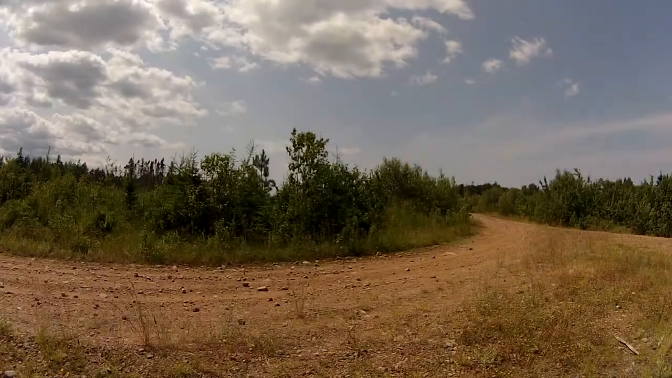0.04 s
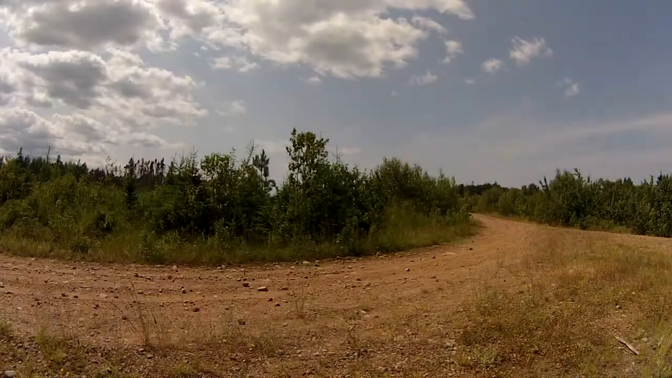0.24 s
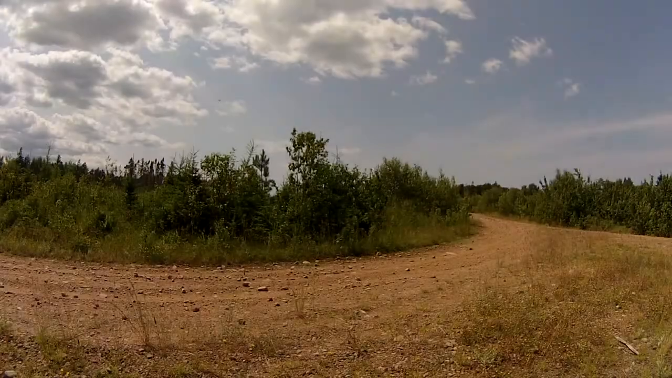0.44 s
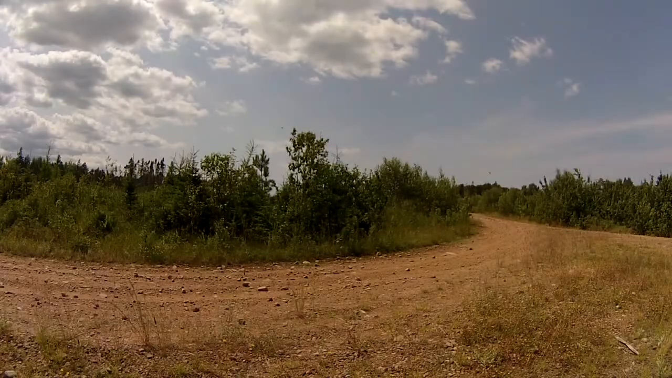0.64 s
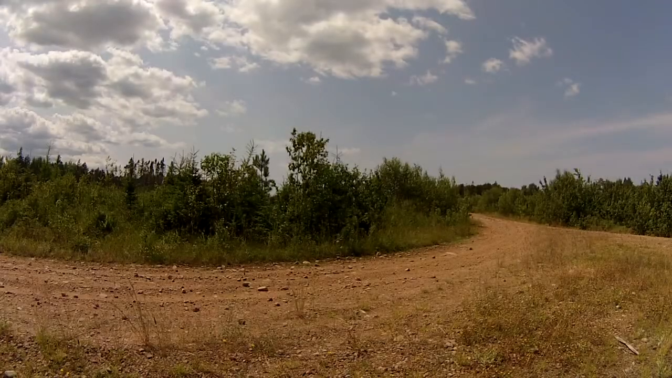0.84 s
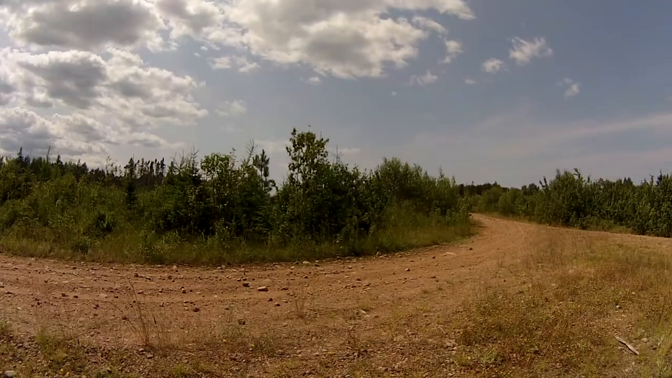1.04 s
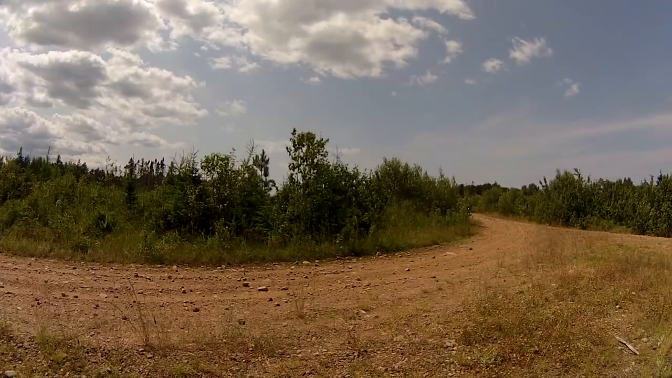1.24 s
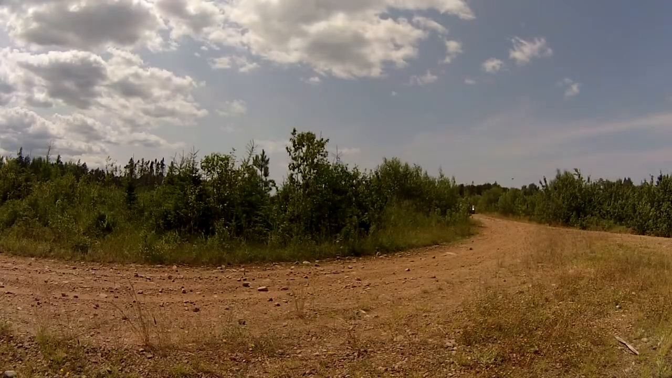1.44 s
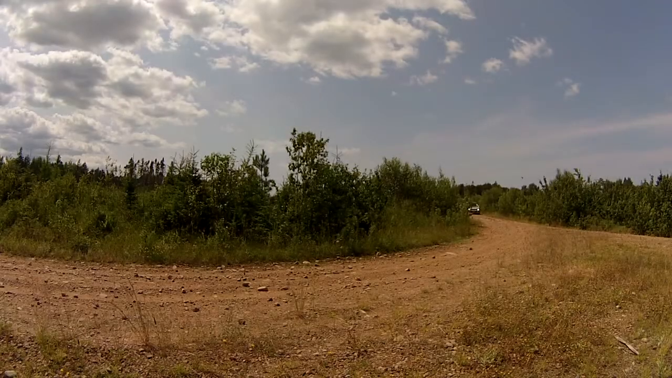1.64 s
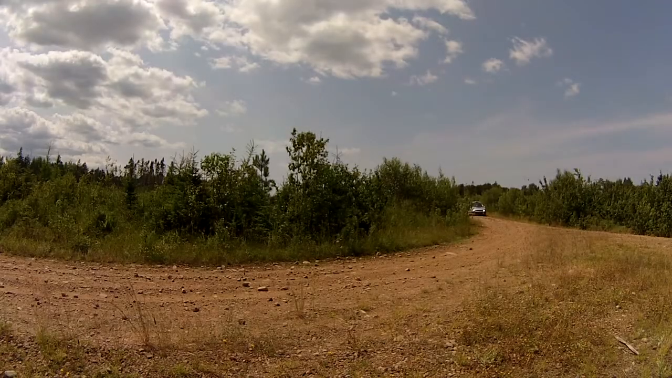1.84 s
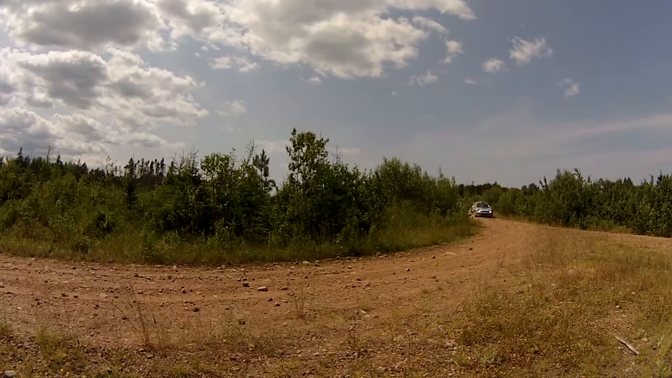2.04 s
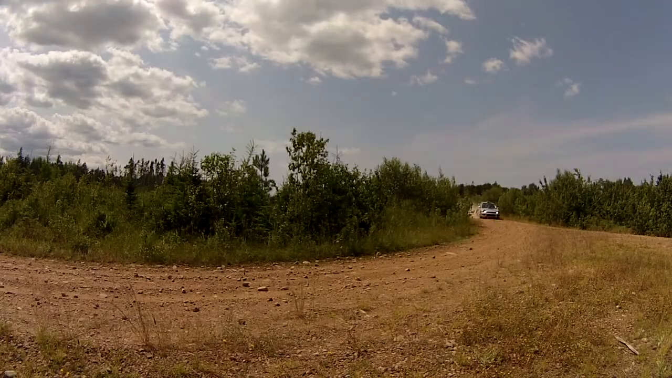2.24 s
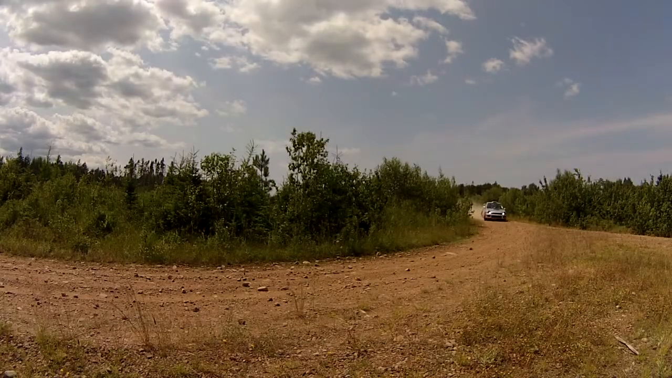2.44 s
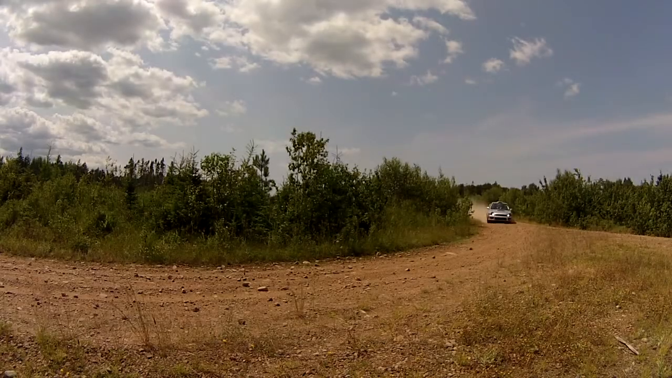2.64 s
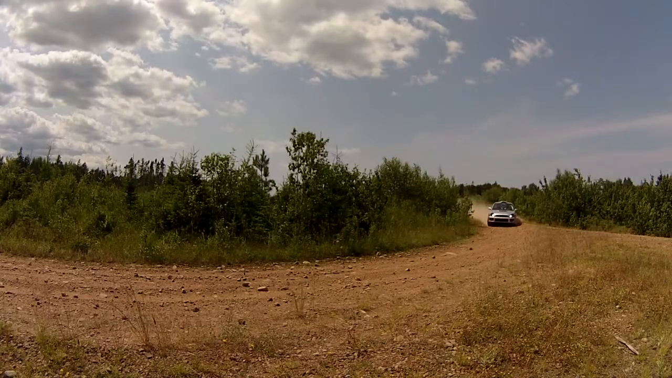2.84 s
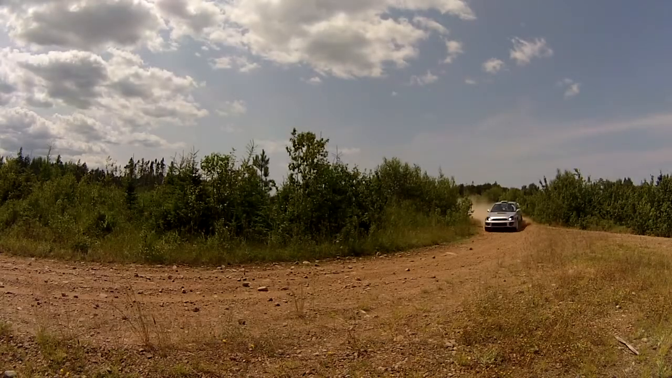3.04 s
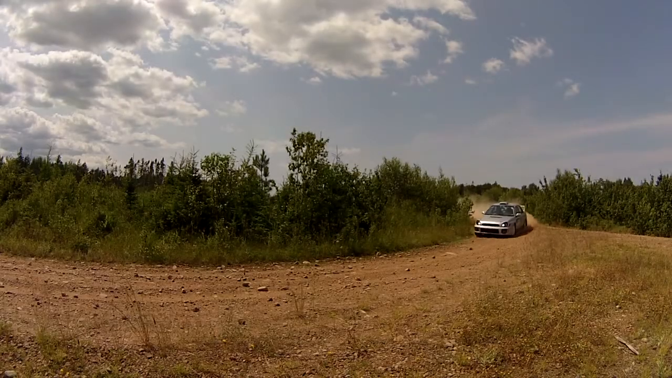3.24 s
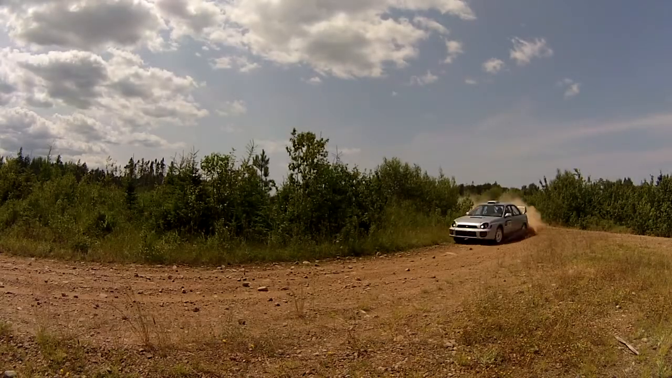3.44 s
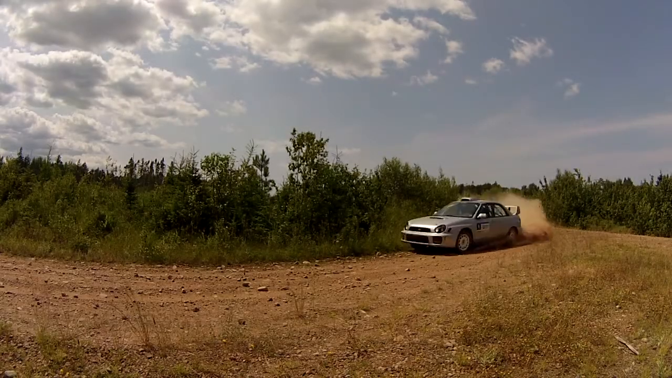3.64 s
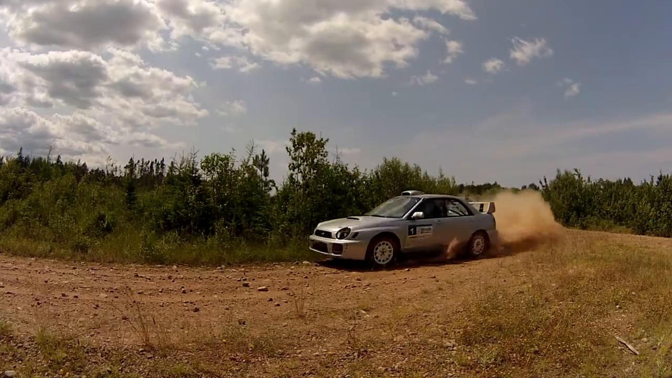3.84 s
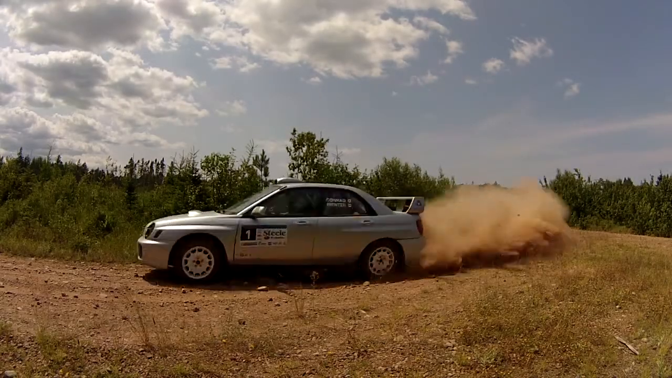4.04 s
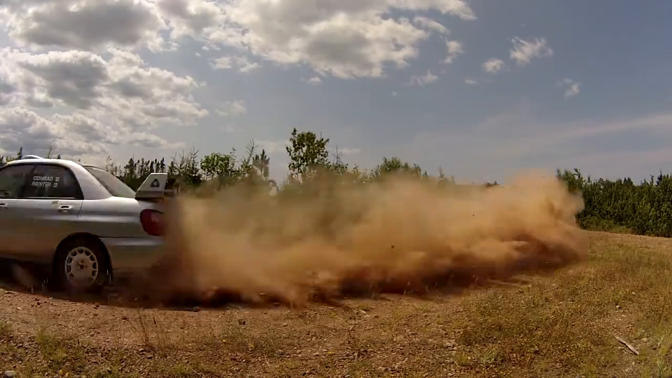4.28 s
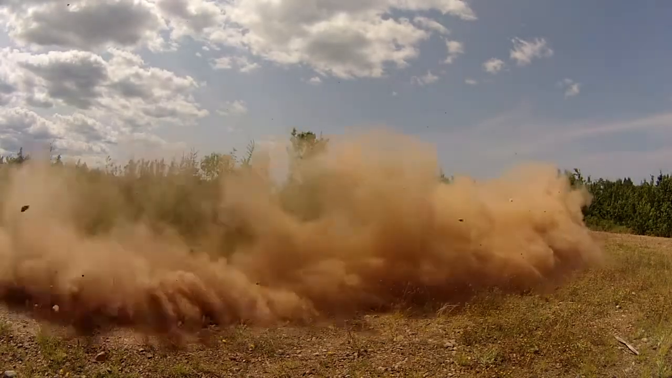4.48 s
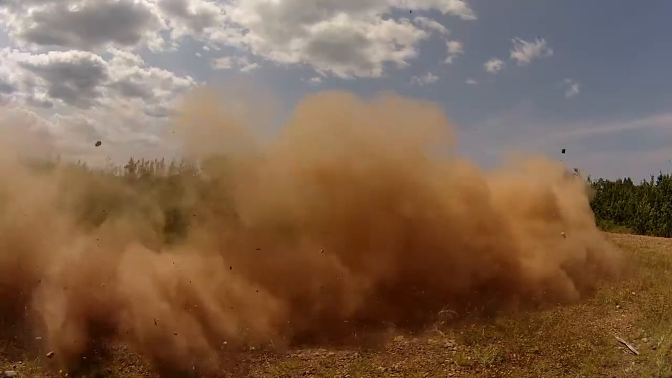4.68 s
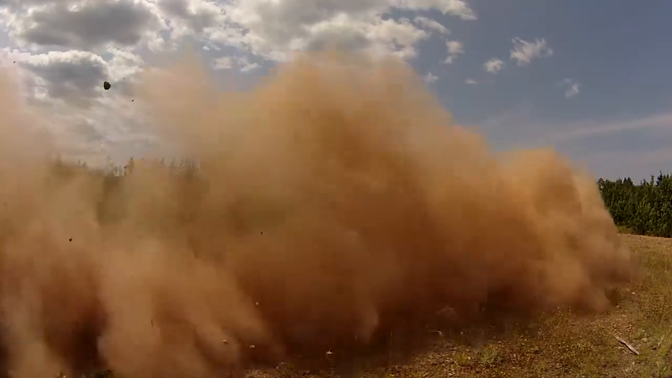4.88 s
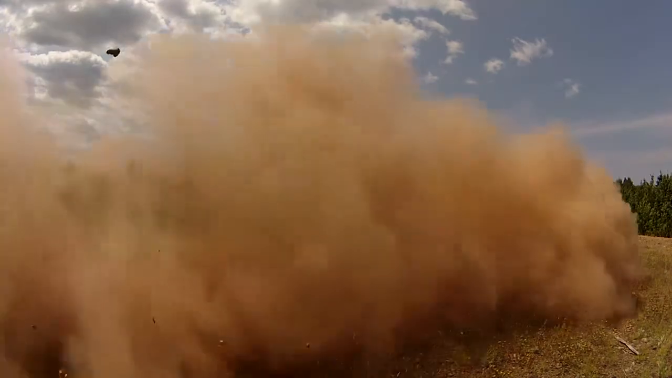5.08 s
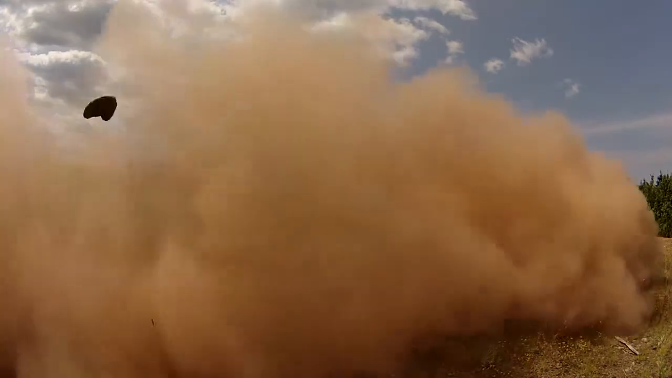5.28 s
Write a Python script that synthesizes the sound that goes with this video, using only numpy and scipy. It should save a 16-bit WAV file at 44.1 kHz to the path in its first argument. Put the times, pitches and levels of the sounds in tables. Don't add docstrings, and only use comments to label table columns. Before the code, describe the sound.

Open-air gravel bend, heard from beside the track through a small, hissy camera microphone. A faint growling engine lifts off after a second, hums softly, then returns to power. Gravel crunch and low air buffets build to a sudden close pass, with barking, crackling exhaust that clips. Afterwards the exhaust falls away under dry spray and a flurry of stone clicks.

```python
import sys
import numpy as np
from scipy import signal
from scipy.fft import rfft, irfft, next_fast_len
from scipy.io import wavfile
from scipy.ndimage import uniform_filter1d, map_coordinates

SR = 44100
rng = np.random.default_rng(int(sys.argv[2]) if len(sys.argv) > 2 else 0)


def store_pcm(level_fs):
    pcm = np.round(np.clip(level_fs, -1, 1) * 32767).astype(np.int16)
    wavfile.write(sys.argv[1], SR, np.atleast_2d(pcm).T)


def volts_from_decibels(level):
    exponent = np.asarray(level, float) / 20
    return 10 ** exponent


N = 234215

# (frequency [Hz], level per Hz [dB])
HISS_COLOUR = [(3240, -52), (5500, 10), (9000, 8), (10500, 8), (11300, 6), (14200, 4), (15100, 6),
               (15600, -21)]
# (frequency [Hz], level [dB])
CAMERA_WHINE = [(10519, -86)]

# (time [s], level [dB])
ROAR_LEVEL = [(0, -57.5), (.74, -57), (1.36, -56.5), (1.7, -55.5), (2.03, -53), (2.4, -52.5), (2.88, -44),
              (3.49, -37.5), (3.96, -28.5), (4.18, -23), (4.5, -24), (4.58, -25.5), (4.75, -30),
              (4.98, -33), (5.31, -33.5)]
# (frequency [Hz], level per Hz [dB])
ROAR_COLOUR = [(60, -37.5), (120, 2), (260, 2.5), (530, -2.5), (1060, -9), (4300, -22.5), (5300, -27.5),
               (6200, -38.5), (11000, -69)]
# (frequency [Hz], level per Hz [dB])
SPRAY_COLOUR = [(4000, -37), (6000, -12), (7600, -6), (9000, -7), (12000, -5), (14000, -14), (15300, -20),
                (16000, -70)]
# (frequency [Hz], level per Hz [dB])
BUFFET_COLOUR = [(12, -19), (20, -36), (43, 19), (86, 17.5), (110, -12.5), (140, -72), (240, -120)]
# (time [s], rise [dB])
GUSTS = [(1.7, 10), (2.7, 10), (3.3, 5), (3.6, 7), (3.95, 6), (4.2, 11), (4.67, -2), (4.821, -1), (5.3, 4)]

# (time [s], peak level [dB], pitch [Hz])
STONE_HITS = [(2.6986, -57, 3676), (2.8107, -48, 3580), (3.149, -48, 3550), (3.2017, -40, 3430),
              (3.683, -36, 4810), (3.707, -30, 3140), (3.9924, -47, 3730), (4.6586, -33, 3760),
              (4.6853, -30.5, 3342), (4.7737, -31.5, 3240), (4.853, -35, 3270), (4.8799, -27, 3290),
              (4.978, -32, 4270), (5.0385, -24.5, 3582), (5.0557, -27.5, 3293), (5.0829, -36, 3640)]
# (time [s], peak level [dB], pitch [Hz])
CHIP_HITS = [(2.892, -56, 10500), (3.4044, -52, 10500), (3.4176, -50, 6530), (3.628, -52, 7548),
             (3.6836, -45, 7618), (3.705, -44.5, 7400), (4.9113, -41, 7878), (4.9791, -54.5, 7692),
             (5.0627, -51, 7850), (5.1026, -43, 7950), (5.1386, -45, 10100), (5.157, -47.5, 8030),
             (5.1942, -42.5, 7640), (5.215, -55, 7042), (5.2495, -50, 6507), (5.2794, -55, 7520),
             (5.3054, -42.5, 6443)]
# (time [s], peak level [dB], pitch [Hz])
FLOOR_PINGS = [
    (2.449, -56, 4448),
    (2.742, -48, 4400),
    (3.9345, -28, 4220),
]
# (time [s], peak level [dB], pitch [Hz])
GRAVEL_SCRAPES = [
    (3.297, -36, 2300),
    (3.876, -49, 9000),
    (4.142, -41, 8500),
]
# (width [octaves], time to fade by 60 dB [s])
HIT_KINDS = [
    (.55, .013),
    (.4, .012),
    (.09, .028),
    (.5, .075),
]

# (time [s], rate [Hz])
CYCLE_RATE = [(0, 36.77), (.58, 41.04), (.89, 41.66), (1.0, 38.95), (1.15, 40.54), (1.29, 39.43),
              (1.95, 31.03), (2.4, 32.15), (2.62, 31.32), (3.12, 35.86), (3.45, 36.77), (3.84, 37.73),
              (3.96, 40.4), (4.06, 37.4), (4.28, 38.45), (4.43, 35.32), (4.75, 34.63), (5.31, 35.05)]
# (time [s], level [dB])
EXHAUST_LEVEL = [(0, -54.5), (.45, -56), (.88, -51), (.95, -55), (1.02, -52), (2.08, -44.5), (2.62, -42.5),
                 (3.31, -31), (3.45, -28.5), (3.89, -21), (3.95, -25), (4.08, -16), (4.36, -12),
                 (4.63, -12), (4.7, -16), (4.85, -16), (5.1, -21), (5.31, -23.5)]
# (time [s], throttle [0-1], unevenness of the banks [0-1], aim at the microphone [0-1])
DRIVER = [(0, .85, .7, .7), (.9, .85, .6, .85), (.97, .03, .15, .2), (2.55, .1, .1, 0), (2.75, .5, .9, .3),
          (3.3, .55, .7, 0), (3.5, .75, .33, 0), (3.95, .75, .33, 0), (4.07, .5, .4, 0),
          (4.2, .85, .3, .75), (4.3, .94, .35, .85), (4.45, 1, .3, 1), (4.62, 1, .3, .55),
          (4.75, 1, .3, .05), (5.31, 1, .3, .05)]
# (multiple of the cycle rate [1], level [dB])
OVERRUN_HUM = [(3, -1.5), (6, -13.5), (7, 4), (10, -20), (11, -19)]
# (frequency [Hz], level [dB])
BARK_COLOUR = [(150, -40), (230, -9), (280, 0), (345, -3), (385, -8), (430, -30), (520, -60), (900, -120)]
# (frequency [Hz], level [dB])
RASP_COLOUR = [(335, -41), (415, 0), (575, 1), (725, -5), (1250, -11), (1700, -15), (2100, -28),
               (9000, -120)]
# (frequency [Hz], level [dB])
CRACK_COLOUR = [(800, -30), (1500, -8), (2400, 0), (3500, -3), (4200, -9), (5500, -22), (7000, -27),
                (15500, -66)]
# (frequency [Hz], level [dB])
EDGE_COLOUR = [(600, -40), (900, -5), (1300, 0), (1700, -2), (2300, -10), (5500, -19), (8000, -24),
               (15500, -44)]


def unit(x):
    return x / np.sqrt(np.mean(x ** 2) + 1e-20)


def steady(x):
    power = uniform_filter1d(uniform_filter1d(x ** 2, SR // 8), SR // 8)
    return x / np.sqrt(np.abs(power) + 1e-20)


def curves(rows):
    s, *columns = np.transpose(rows)
    return [np.interp(np.arange(N) / SR, s, column) for column in columns]


def wobble(rate):
    knots = rng.standard_normal(int(N * rate / SR) + 4)
    return map_coordinates(knots, [np.arange(N) * rate / SR])


def bump(s, half_s):
    return np.exp(-((np.arange(N) / SR - s) / half_s) ** 2)


def gain(points, hz):
    f, db = np.transpose(points)
    return volts_from_decibels(np.interp(np.log(hz + 1), np.log(f), db))


def colour(points):
    def response(hz):
        cepstrum = irfft(np.log(gain(points, hz) + 1e-6))
        cepstrum[1:len(cepstrum) // 2] *= 2
        cepstrum[len(cepstrum) // 2 + 1:] = 0
        return np.exp(rfft(cepstrum))
    return response


def filtered(x, response):
    m = 2 * next_fast_len(N // 2 + 8192)
    return irfft(rfft(x, m) * response(np.fft.rfftfreq(m, 1 / SR)), m)[:N]


def pulses(at, size):
    k = np.floor(at)[:, None] + np.arange(-7, 9)
    away = k - at[:, None]
    shape = np.sinc(away) * np.cos(np.pi * away / 16) ** 2
    places = np.clip(k, 0, N).astype(int)
    return np.bincount(places.ravel(), (shape * size[:, None]).ravel(), N + 1)[:N]


def behind():
    pass_s, turn_s = 4.36, 0.042
    return .5 + .5 * np.tanh((np.arange(N) / SR - pass_s) / turn_s)


def camera_noise():
    hiss = volts_from_decibels(-76) * unit(filtered(rng.standard_normal(N), colour(HISS_COLOUR)))
    t = np.arange(N) / SR
    whine = sum(volts_from_decibels(db + 3) * np.sin(2 * np.pi * hz * t) for hz, db in CAMERA_WHINE)
    return hiss + whine


def buffet():
    roar_db, = curves(ROAR_LEVEL)
    gust_half_s = 0.11
    level_db = roar_db - 16.5 + sum(db * bump(s, gust_half_s) for s, db in GUSTS)
    air = unit(filtered(rng.standard_normal(N), colour(BUFFET_COLOUR)))
    return volts_from_decibels(level_db + 3.3 * wobble(9.9)) * air


def grit(rate, spread_db, share):
    count = int(rate * N / SR)
    at = rng.uniform(6.7, N - 9, count)
    size = volts_from_decibels(spread_db * np.minimum(rng.exponential(size=count), 5))
    grains = pulses(at, size * rng.choice([-1, 1], count))
    return share * unit(grains) + rng.standard_normal(N)


def tyres():
    roar_db, = curves(ROAR_LEVEL)
    crunch = unit(filtered(grit(3200, 3.3, share=0.34), colour(ROAR_COLOUR)))
    roar = volts_from_decibels(roar_db + 2.0 + 0.81 * wobble(12) + 1.13 * wobble(45)) * crunch
    shadow_db = -6 * bump(4.48, .14)
    spray_db = roar_db - 31 + 0.5 * behind() + shadow_db
    fine = unit(filtered(grit(900, 3.1, share=0.65), colour(SPRAY_COLOUR)))
    return roar + volts_from_decibels(spray_db + 2.1 * wobble(24.14)) * fine


def stones():
    out, t = np.zeros(N + SR), np.arange(2048) / SR
    hz = np.fft.rfftfreq(len(t), 1 / SR) + 1
    attack = 1 - np.exp(-t / 0.000095)
    hits = (STONE_HITS, CHIP_HITS, FLOOR_PINGS, GRAVEL_SCRAPES)
    for table, (width, fade_s) in zip(hits, HIT_KINDS):
        for s, db, pitch in table:
            band = np.exp(-.5 * (np.log2(hz / pitch) / width) ** 2)
            burst = unit(irfft(rfft(rng.standard_normal(len(t))) * band))
            out[round(s * SR):][:len(t)] += volts_from_decibels(db + 1.0 - 60 * t / fade_s) * burst * attack
    return out[:N]


def engine_speed():
    shudder_hz, depth_hz, from_s, lasts_s = 4.33, .45, 3.39, 1.68
    bite = 1 - bump(4.15, .16)
    since = np.clip(np.arange(N) / SR - from_s, 0, lasts_s)
    return curves(CYCLE_RATE)[0] + depth_hz * bite * np.sin(2 * np.pi * shudder_hz * since)


def engine():
    cycle_hz = engine_speed()
    turns = .3 + np.cumsum(cycle_hz) / SR
    level_db, = curves(EXHAUST_LEVEL)
    throttle, uneven, aim = curves(DRIVER)
    coast = 1 - np.clip(throttle, 0, 1)
    shut, past = coast ** 2, behind()
    rough = .04 + .4 * coast ** 1.5
    lead = .25 + past * (.55 - aim)

    firing = np.arange(4, int(4 * turns[-1]))
    here = np.interp(firing / 4, turns, np.arange(N)).astype(int)
    bank = np.pi / 2 * firing - lead[here]
    header_lag = .006
    at = np.interp(firing / 4 - header_lag * np.sin(bank), turns, np.arange(N))
    luck = rng.standard_normal((len(at), 2))
    lean = 1 + np.clip(uneven[here], 0, .95) * np.cos(bank)
    size = lean * volts_from_decibels(8 * rough[here] * luck[:, 0])
    at = at + 30 * rough[here] * luck[:, 1]
    train = pulses(at, size)

    puff_s = 0.0019
    puff_level = np.abs(signal.lfilter([1], [1, -np.exp(-1 / (puff_s * SR))], train))
    puff = puff_level * rng.standard_normal(N)

    def gas(steep):
        steeper = size * lean ** (steep * (1 - coast[here]) ** 2)
        return np.sqrt(1 - rough ** 2) * steady(pulses(at, steeper)) + rough * steady(puff)

    def order(k, lag):
        level = np.sqrt(2) * volts_from_decibels((.6 + 2 * coast) * wobble(8))
        return level * np.cos(2 * np.pi * k * turns - lag + .08 * wobble(6))

    def pipe(points, steep):
        mode_hz, width_hz = 272, 130
        def response(hz):
            return gain(points, hz) * np.exp(1j * np.arctan2(mode_hz ** 2 - hz ** 2, hz * width_hz))
        return steady(filtered(gas(steep), response))

    fourth_db = level_db - 2.5 - 5.5 * past - 26.5 * uneven * coast
    fifth_db = level_db - 14.5 + 9.5 * shut + 10.5 * uneven
    boom = volts_from_decibels(fourth_db) * (order(4, -1.5) + volts_from_decibels(-14) * order(3, 0))
    boom = boom + volts_from_decibels(fifth_db) * order(5, lead - 1.4)

    hum = 0
    for k, db in OVERRUN_HUM:
        opens_db = -.5 * (k - 3.5) * (cycle_hz - 32.5)
        hum = hum + volts_from_decibels(db + opens_db) * order(k, 0)
    hum = shut * volts_from_decibels(fifth_db - 4.5) * hum

    bark_db = level_db + 0.4 - 16.5 * shut - 9 * uneven * coast
    bark = volts_from_decibels(bark_db) * pipe(BARK_COLOUR, 0)
    far_db = .06 * (level_db - level_db.max())
    rasp = volts_from_decibels(level_db - 7.5 - 11.5 * shut + far_db) * pipe(RASP_COLOUR, 1.2)
    shock = filtered(1.3 * steady(train) + steady(puff), colour(CRACK_COLOUR))
    crack = volts_from_decibels(level_db - 32 + 21 * aim) * steady(shock)
    edge = volts_from_decibels(level_db - 38 + 23 * aim * past) * pipe(EDGE_COLOUR, 0)
    return boom + hum + bark + rasp + crack + edge


def scene():
    return (buffet() + tyres() + stones() + engine())[None]


def roll_off(x):
    return signal.sosfilt(signal.butter(12, 15740, fs=SR, output="sos"), x)


def record(dry):
    mix = np.clip(dry + camera_noise(), -1, 1)
    return roll_off(mix)


dry = scene()
out = record(dry)
store_pcm(out)
```